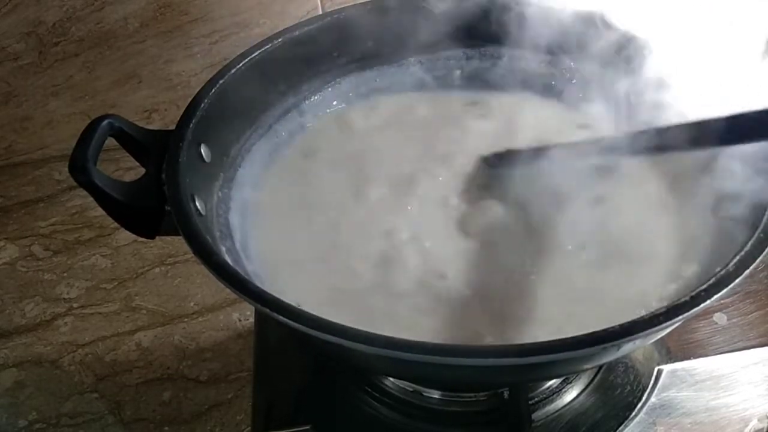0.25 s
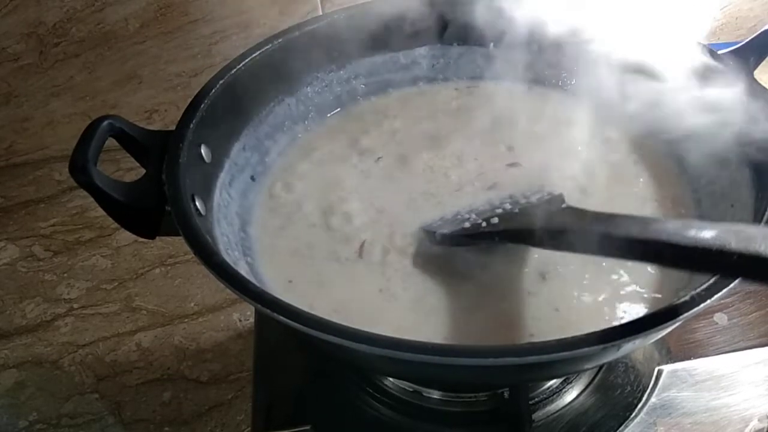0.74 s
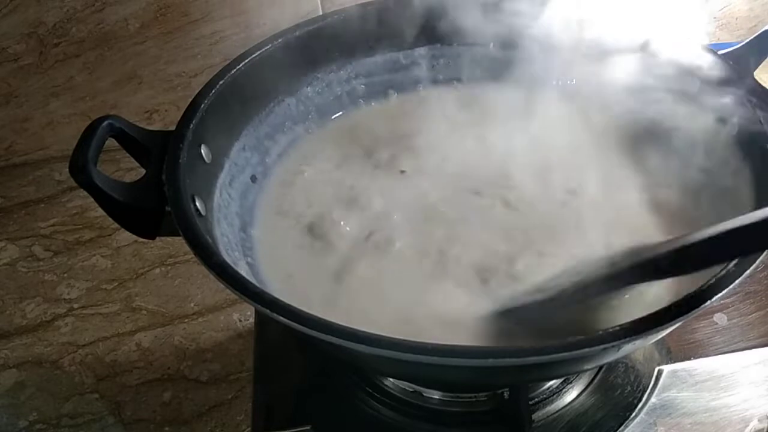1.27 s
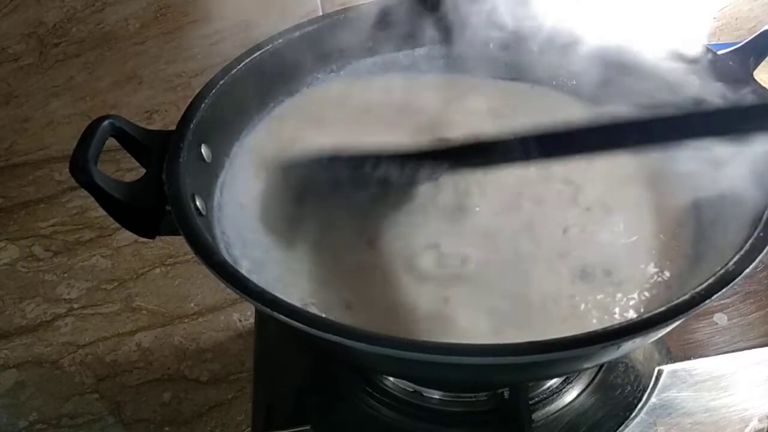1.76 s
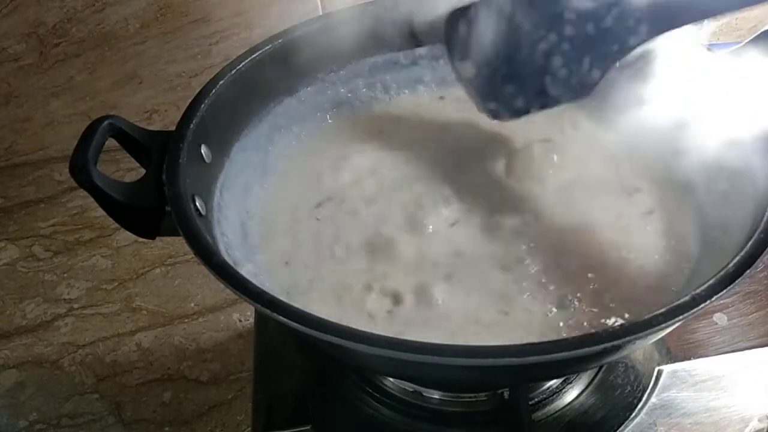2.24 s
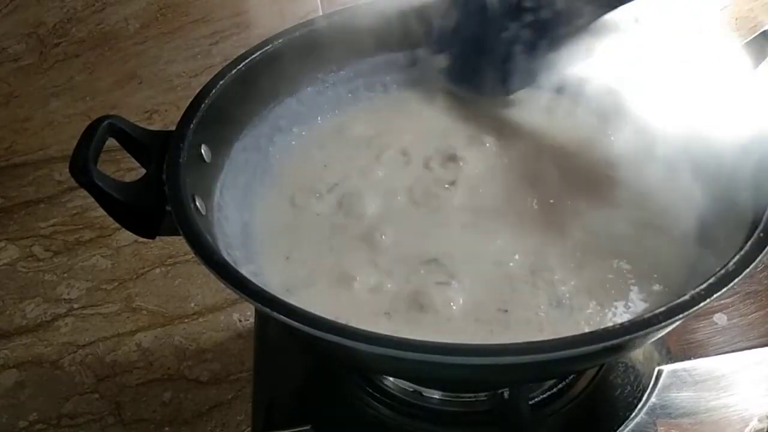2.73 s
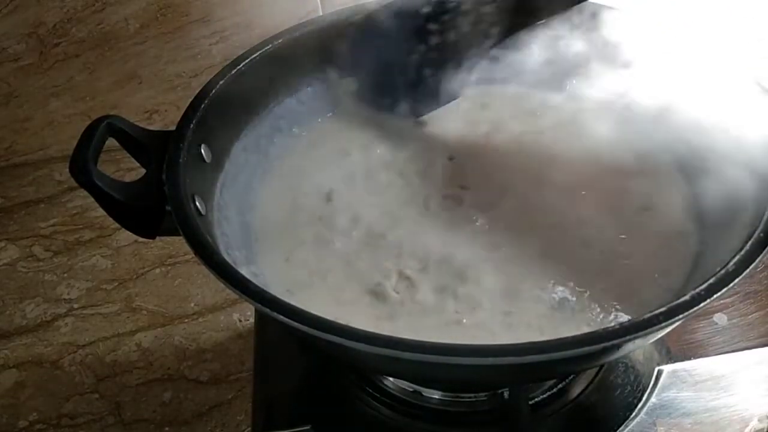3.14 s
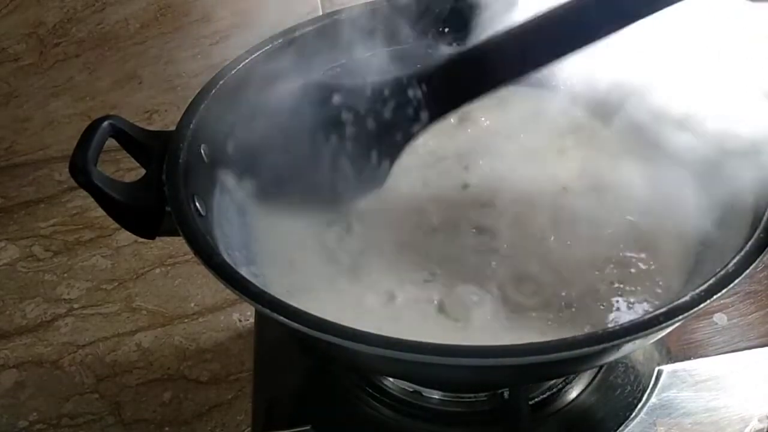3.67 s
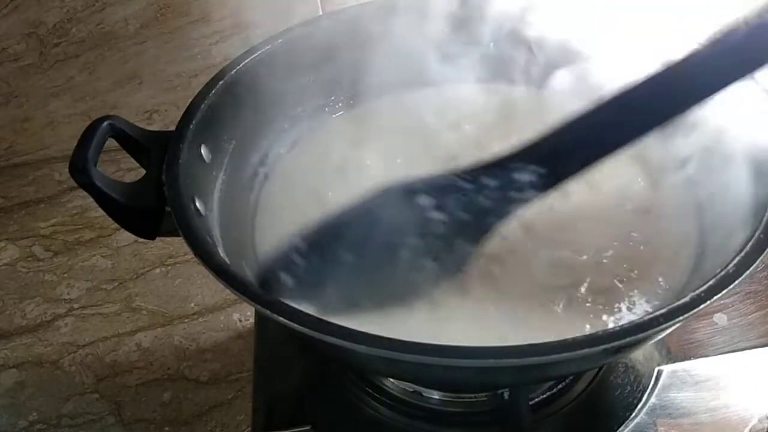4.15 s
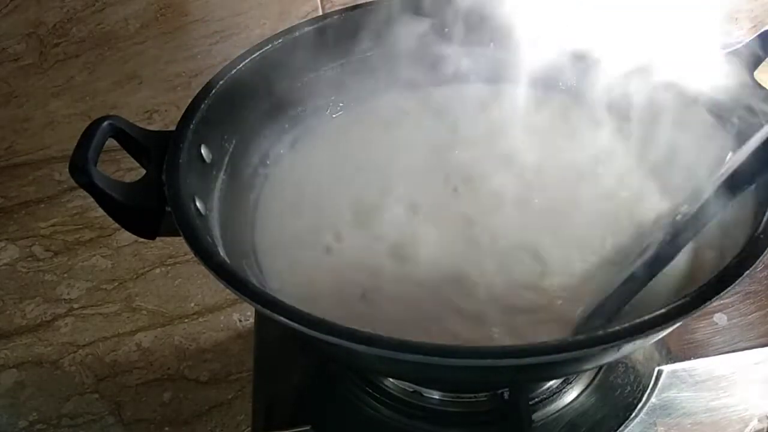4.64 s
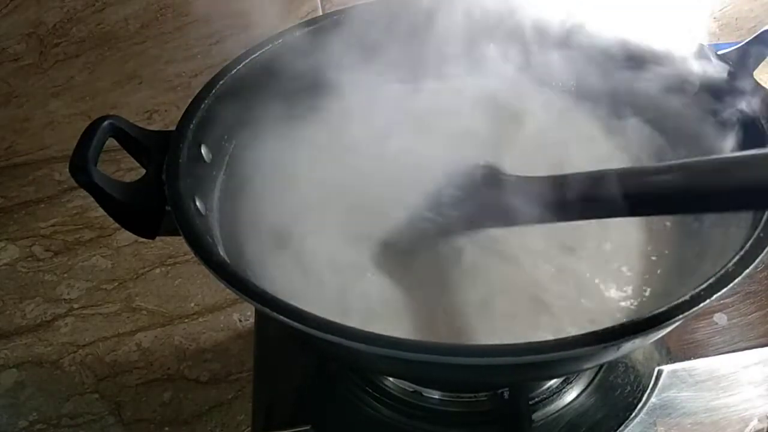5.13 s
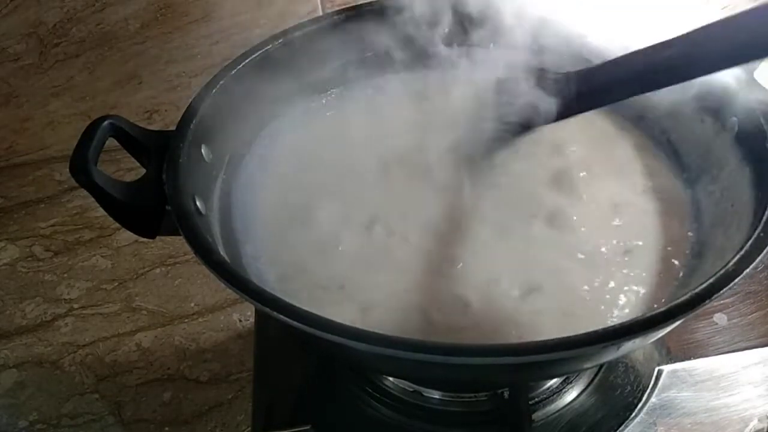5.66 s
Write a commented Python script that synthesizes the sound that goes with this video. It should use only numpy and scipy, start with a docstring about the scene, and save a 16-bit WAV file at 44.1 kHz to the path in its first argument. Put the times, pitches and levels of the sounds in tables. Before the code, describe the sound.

Mono, close to a metal pan in a hard, briefly echoing kitchen. Thick porridge simmers throughout: hollow, wet plops of low-mid to mid pitch, singly or bunched, among many tiny bubbles. At 0.35-0.45 s the sound cuts out completely. The burner gives a faint, deep rumble, bumping up as the pan rocks. The spatula rubs grittily and makes the pan hum low around 0.5-1 s, with a clear scrape near 0.8 s and a light tap; another scrape comes at 1.7 s with a burst of hiss and spitting. The loudest plop is at 2.0 s. At 2.67 s a hard knock cracks and rings the pan for about half a second, with a weaker rap following. Bright droplet snaps and crackle continue, busy around 4.2-4.8 s; scraping returns at 5-5.8 s. A small bird chirps faintly at 2.9 s, then repeatedly from 4.7 s. A thin, high, wavering whistle sounds from 5.5 s.

```python
"""Thick porridge simmers in a pan in a hard-walled kitchen: swelling sine notes plop, singly and in swarms.
Droplets spit and crackle as short pings on the hot rim; steam hisses as gritty filtered impulses.
A spatula scrapes in clumped impulses, makes the pan drone, and knocks it, once hard, ringing its modes.
The burner rumbles as low noise. A small bird chirps in gliding notes; a thin sine whistle comes near the end."""
import sys
import numpy as np
from scipy import signal
from scipy.fft import rfft, irfft, next_fast_len
from scipy.io import wavfile
from scipy.ndimage import uniform_filter1d

SR = 44100
rng = np.random.default_rng(int(sys.argv[2]) if len(sys.argv) > 2 else 0)


def wrap_up_sound(samples):
    """Save the sound to the file named by the first command line argument, as 16-bit audio."""
    columns = np.atleast_2d(samples).T
    # keep every value between -1 and 1, then stretch to whole-number steps
    tamed = np.clip(columns, -1, 1)
    steps = np.round(tamed * 32767).astype(np.int16)
    wavfile.write(sys.argv[1], SR, steps)


N = 260190
TIME_S = np.arange(N) / SR


def amp(db):
    """Decibels to gain."""
    return 10 ** (np.asarray(db) / 20)


def unit(x):
    """x at rms 1."""
    return x / np.sqrt(np.mean(x ** 2) + 1e-20)


def along(points, hz):
    """(Hz, value) points interpolated on a log frequency axis."""
    f, v = np.transpose(points)
    return np.interp(np.log(hz + 1), np.log(f), v)


def add(track, start_s, sound):
    """Mix a sound into the track at start_s."""
    part = track[max(0, round(start_s * SR)):][:len(sound)]
    part += sound[:len(part)]


def clipped_normal(shape, top=2):
    """Gaussian scatter held between -2 and top."""
    return np.clip(rng.standard_normal(shape), -2, top)


def filtered(x, response):
    """x times a response of frequency."""
    m = next_fast_len(len(x) + SR // 10)
    return irfft(rfft(x, m) * response(np.fft.rfftfreq(m, 1 / SR)), m)[:len(x)]


def coloured(x, spectrum, size=1024):
    """x through a causal, minimum-phase filter of energy 1 with the given spectrum."""
    gain = amp(along(spectrum, np.fft.rfftfreq(size, 1 / SR)))
    cepstrum = irfft(np.log(gain + 1e-6))
    cepstrum[1:size // 2] *= 2
    cepstrum[size // 2 + 1:] = 0
    pulse = irfft(np.exp(rfft(cepstrum)))
    return signal.fftconvolve(x, pulse / np.linalg.norm(pulse))[:len(x)]


def noise(spectrum):
    """Steady noise of rms 1 with the given spectrum."""
    return unit(filtered(rng.standard_normal(N), lambda hz: amp(along(spectrum, hz))))


def grains(rate_hz, spread_db):
    """Random impulses of uneven size and random sign, rms 1."""
    size = amp(spread_db * clipped_normal(N))
    return unit((rng.random(N) < rate_hz / SR) * size * rng.choice([-1, 1], N))


def clumps(rate_hz, depth_db):
    """A gain of rms 1 that wanders between random levels, rate_hz of them a second."""
    knots = clipped_normal(4096, top=1.5)
    return unit(amp(depth_db * np.interp(TIME_S * rate_hz, np.arange(len(knots)), knots)))


def swell(start_s, rise_s, hold_s, t60_s):
    """An envelope of peak 1: it rises, holds and dies away."""
    t = TIME_S - start_s
    rise = np.clip(t / max(rise_s, .001), 0, 1) ** 2
    return rise * amp(-60 * np.clip((t - rise_s - hold_s) / t60_s, 0, 2))


# kitchen reverberation before stretch: (f/Hz, t60/s)
KITCHEN_T60 = [(150,1),(400,0.21),(1000,0.45),(3000,0.4),(8000,0.24),(15000,0.37)]


def kitchen(x, wet_db, stretch=1, count=8):
    """x plus room reflections: decaying noise tails, a new one for each of count equal pieces."""
    out = x.copy()
    for k, piece in enumerate(np.array_split(x, count)):
        hz, t, z = signal.stft(rng.standard_normal(SR * 2 // 3), SR, nperseg=256)
        early = 1 + 0.9 * amp(-60 * t / 0.063)  # pan wall and counter answer first
        decay = amp(-60 * t / (stretch * along(KITCHEN_T60, hz)[:, None]))
        tail = signal.istft(z * early * decay, SR, nperseg=256)[1]
        wet = signal.fftconvolve(piece, tail / np.linalg.norm(tail))
        add(out, k * N / count / SR, amp(wet_db) * wet)
    return out


def bubble(hz, cycles, glide):
    """A steam pocket opens: its note swells, rises as the hole widens, and dies."""
    t = np.arange(SR // 20) / SR
    u = t * hz / max(cycles, .2)  # level peaks at u = 1.449
    phase = 2 * np.pi * hz * np.cumsum(1 + glide * np.tanh((u - 1.5) / 2)) / SR
    return (u / 1.491 * np.exp(1 - u / 1.449)) ** 1.78 * np.sin(phase)


# flurry of small bubbles after a big one: level relative to it, ceiling before size scatter
FLURRY_REL_DB, FLURRY_CEILING_DB = -18.5, -53.5
FLURRY_LAG_S, FLURRY_SPREAD_S, FLURRY_SPREAD_OCT = 0.0066, .05, 0.5394
STRAY_DB, STRAY_HZ, STRAY_SPREAD_OCT = -63, 800, 0.631
SMALL_SWELL_CYCLES, SMALL_SPREAD_DB = 2.39, 3
FROTH_DB, FROTH_HZ, FROTH_SPREAD_OCT, FROTH_SWELL_S = -73.5, 2800, 0.94, 0.0051
SURGE_SPREAD_OCT = 0.397
# boil welling up in a patch: (t/s, length/s, bubble level/dB, typical f/Hz)
SURGES = [(0,0.3,-54,960),(0,0.19,-65,1400),(0.772,0.19,-51,912),(1.152,.25,-63.5,1304),(1.478,0.3,-51.5,498),(1.497,0.19,-53.5,1290),(2.699,.16,-47.5,518),(3.599,0.32,-54,875),(4.614,.3,-54,800),(4.884,0.17,-57,594),(5.028,0.23,-52,1031),(5.761,.14,-53.5,615)]


def simmer(flurry_count=9, surge_count=24, stray_count=220, froth_count=130):
    """Small bubbles: a flurry after each big one, surges, strays all over the surface, and pinhead froth."""
    out, swarm = np.zeros(N), []
    for s, db, hz, _ in PLOPS:
        flurry_db = min(db + FLURRY_REL_DB, FLURRY_CEILING_DB)
        for lag in rng.standard_normal(flurry_count):
            start_s = s + FLURRY_LAG_S + FLURRY_SPREAD_S * abs(lag)
            swarm.append((start_s, flurry_db, hz, FLURRY_SPREAD_OCT))
    for s, length_s, db, hz in SURGES:
        swarm += [(s + length_s * u, db, hz, SURGE_SPREAD_OCT) for u in rng.random(surge_count)]
    for s in rng.uniform(0, N / SR, stray_count):
        swarm.append((s, STRAY_DB, STRAY_HZ, STRAY_SPREAD_OCT))

    for (s, db, hz, octaves), (pitch, size, life) in zip(swarm, clipped_normal((len(swarm), 3))):
        cycles = SMALL_SWELL_CYCLES * np.exp(0.33 * life)
        note = bubble(hz * 2 ** (octaves * pitch), cycles, glide=0.046)
        add(out, s, amp(db + SMALL_SPREAD_DB * size) * note)

    froth_s = rng.uniform(0, N / SR, froth_count)
    for s, (pitch, size) in zip(froth_s, clipped_normal((froth_count, 2))):
        hz = FROTH_HZ * 2 ** (FROTH_SPREAD_OCT * pitch)
        add(out, s, amp(FROTH_DB + 5.2 * size) * bubble(hz, hz * FROTH_SWELL_S, glide=.015))
    return kitchen(out, wet_db=-5.5)


SCRAPE_T60_S, DRONE_T60_S = 0.2, 0.29
# blade rub spectrum: (f/Hz, relative level/dB)
RUB_SPECTRUM = [(200,-65),(600,-6),(1100,0.5),(1700,2),(2400,-1),(4000,-7.5),(6000,-6.5),(11000,-32),(16000,-46)]
# spatula strokes: (t/s, rise/s, hold/s, relative scrape level/dB, relative drone level/dB)
STROKES = [(0,0.027,0.04,-73.5,-48),(0.499,0.044,0.032,-67,-43.5),(0.778,0.048,0.016,-42,-39.5),(0.903,0.025,0.018,-48,-48.5),(1.087,0.046,0.21,-56,-68),(1.39,0.038,0.34,-67.5,-92),
           (1.676,0.057,0.11,-46,-55.5),(1.846,0.045,0.2,-75,-43),(2.31,0.021,0.026,-60,-72),(3.274,0.19,0.078,-79,-52.5),(3.616,0.019,0.15,-55,-98),(4.61,.05,.2,-61.5,-91),
           (4.978,0.12,0.05,-50,-60),(5.123,0.086,.12,-50.5,-75),(5.376,0.049,0.037,-54,-55),(5.616,0.2,0.065,-55.5,-63.5)]


def stirring():
    """In each stroke the blade sticks and slips over the metal and sets the pan's lowest mode droning."""
    scraping = sum(amp(db) * swell(s, rise, hold, SCRAPE_T60_S) for s, rise, hold, db, _ in STROKES)
    droning = sum(amp(db) * swell(s, rise, hold, DRONE_T60_S) for s, rise, hold, _, db in STROKES)
    slips = clumps(rate_hz=70, depth_db=6) * grains(rate_hz=780, spread_db=2.0)
    rub = amp(-7) * scraping * coloured(slips, RUB_SPECTRUM)
    # narrow noise band round 194 Hz
    drone = unit(filtered(rng.standard_normal(N), lambda hz: 1 / (1 + ((hz - 194) / 18) ** 4)))
    return kitchen(rub, wet_db=-3.5) + amp(-10.5) * droning * drone


BURNER_DB = -76
BUMP_RISE_S, BUMP_HOLD_S, BUMP_T60_S = 0.0085, 0.015, 0.6
# stove rumble spectrum: (f/Hz, relative level/dB)
RUMBLE_SPECTRUM = [(25,-24),(45,-7.5),(62,-1.5),(76,6),(92,-4),(110,4.5),(130,-13.5),(150,-15),(220,-50)]
# pan rocking on the stove: (t/s, level/dB)
BUMPS = [(0.069,-57.5),(0.259,-66.5),(.84,-74),(1.21,-62),(1.55,-64),(1.971,-53.5),(2.07,-68),(2.58,-65),(2.76,-57.5),(3,-66),(4.76,-63),(5.31,-60),(5.621,-65)]


def stove():
    """The stove rumbles with the flame, and more when the pan rocks on it."""
    rocking = sum(amp(db) * swell(s, BUMP_RISE_S, BUMP_HOLD_S, BUMP_T60_S) for s, db in BUMPS)
    return np.hypot(amp(BURNER_DB), rocking) * noise(RUMBLE_SPECTRUM)


# room background spectrum: (f/Hz, relative level/dB)
QUIET_SPECTRUM = [(18, -25), (30, 15), (81, -16), (145, -55), (203, 42), (424, -22), (775, 31), (1570, -63),
                  (2390, -45), (2950, -55), (5680, -56), (8420, -37), (15800, -14)]


def room_quiet():
    """The quiet of the room: faint steady coloured noise."""
    return amp(-78.5) * noise(QUIET_SPECTRUM)


# bursting-droplet spectrum: (f/Hz, relative level/dB)
SIZZLE_SPECTRUM = [(1060, -36), (1800, -42), (2060, -1.5), (2260, -4.5), (3130, -15.5), (4630, -6.5),
                   (6140, -18.5), (6910, -6), (8060, -0.5), (9580, -9), (15800, -23)]


def ping(hz, t60_s, count=4):
    """A tiny bubble bursts: one main note and a few unrelated ones, peak 1."""
    t = np.arange(SR // 50) / SR
    others_hz = np.clip(7000 * np.exp(.36 * rng.standard_normal(count)), 3000, 13000)
    others_db = rng.normal(0, 3, count) + .5 * along(SIZZLE_SPECTRUM, others_hz)
    pitch_hz = np.r_[hz, others_hz]
    size = np.r_[1, .6 * amp(others_db)]
    onset = (1 - np.exp(-t / 0.0006)) ** 2
    ring = size @ np.sin(2 * np.pi * pitch_hz[:, None] * t) * amp(-60 * t / t60_s) * onset
    return ring / np.abs(ring).max()


DRY_RIM_DB, DRYING_T60_S = -80, 0.47  # relative level of the constant crackle; drying of a wash
POCKET_REL_DB = -15  # hollow under a droplet, relative to its ping
SPRAY_REL_DB, SPRAY_T60_S = -26.5, 0.074  # crackle gain after a spit, relative to its table level
# porridge washing up the hot rim: (t/s, rise/s, hold/s, relative level/dB)
WASHES = [(0.833,0.066,0.023,-61),(1.133,0.039,0.16,-64),(1.7,0.076,0.054,-53.5),(2.7,0.015,0.031,-91),(3.604,0.048,0.19,-56),(4.244,0.012,0.72,-64.5),(4.61,0.047,0.042,-65),(5.28,0.013,0.024,-91),(5.67,0.16,0.061,-64.5)]
# droplets bursting on hot metal: (t/s, relative level/dB, f/Hz)
SPITS = [(.3092,-47.5,8330),(0.475,-42,8140),(0.5448,-31,4660),(0.5638,-31.5,3270),(0.7554,-38.5,5280),(0.8366,-29,7500),(0.9494,-27.5,8070),
         (1.0043,-29.5,5830),(1.136,-32,7820),(1.156,-27.5,8230),(1.2298,-33,7830),(1.255,-32,7640),(1.734,-21.5,7080),(1.9413,-33.5,8330),
         (2.0727,-38,5420),(2.153,-36,8100),(2.187,-35,8500),(2.354,-25.5,8030),(3.0877,-34,7370),(3.1664,-37,4990),(3.231,-40.5,8000),
         (3.3895,-37.5,7200),(3.425,-29.5,7170),(3.463,-31.5,7850),(3.5378,-34.5,7640),(3.6333,-31,7400),(3.8102,-33,8830),(3.9745,-35.5,8350),(4.05,-38,7100),
         (4.2759,-28.5,5780),(4.346,-32,7020),(4.4242,-33.5,7500),(4.5049,-29,8080),(4.6287,-23.5,7830),(4.6538,-26,5600),(4.734,-21.5,3460),
         (4.951,-49,8300),(5.016,-34,5400),(5.2014,-26,3350),(5.2347,-29,3580),(5.31,-31.5,7450),(5.617,-33,3470)]


def sizzle(count=900):
    """Droplets burst on the hot rim: sharp spits, and a crackle of tiny pings that grows with washes and spits."""
    crackle, spits, t = np.zeros(N), np.zeros(N), np.arange(SR // 50) / SR
    for s, (pitch, size) in zip(rng.uniform(0, N / SR, count), clipped_normal((count, 2), top=(2, 1.7))):
        add(crackle, s, amp(4 * size) * ping(6000 * np.exp(.38 * pitch), t60_s=.009))

    wetness = amp(DRY_RIM_DB) + sum(amp(db) * swell(s, rise, hold, DRYING_T60_S)
                                    for s, rise, hold, db in WASHES)
    spray = amp(SPRAY_REL_DB - 60 * np.arange(SR // 2) / SR / SPRAY_T60_S)
    for s, db, hz in SPITS:
        # the film snaps
        tear = coloured(rng.standard_normal(len(t)) * amp(-60 * t / 0.016), SIZZLE_SPECTRUM)
        tear = 0.41 * tear / np.abs(tear).max()
        # the hollow under it rings lower
        pocket = ping(3400 * np.exp(0.14 * rng.standard_normal()), t60_s=0.016, count=2)
        burst = ping(hz, t60_s=0.0086) + tear + amp(POCKET_REL_DB) * pocket
        add(spits, s, amp(db - 10.5) * burst)
        add(wetness, s, amp(db) * spray)
    rim = amp(-4.5) * wetness * unit(coloured(crackle, SIZZLE_SPECTRUM))
    return kitchen(rim + spits, wet_db=2.5)


# big bubbles: (t/s, level/dB, f/Hz, swell scale/cycles)
PLOPS = [(.172,-47,796,3.1),(0.322,-43,807,2.8),(.342,-34.5,1216,1.1),(.452,-39,1260,1.02),(.472,-34.5,1080,0.6),
         (1.085,-37.5,549,0.64),(1.098,-46.5,676,1.5),(1.132,-37,565,0.53),(1.154,-34.5,2000,1.4),(1.179,-36.5,630,0.48),(1.33,-35,1097,0.34),
         (1.462,-42,325,1.2),(1.501,-38,445,0.93),(1.513,-36.5,514,1.5),(1.673,-35,1180,0.33),(1.693,-58,330,0.88),(1.805,-32.5,1405,0.83),
         (1.961,-31,1160,0.45),(1.998,-23,738,0.95),(2.042,-34.5,1160,1.2),(2.137,-42,810,1.4),(2.28,-51,510,3.1),(2.321,-37.5,422,0.99),(2.381,-40,1655,2.4),
         (2.587,-49,435,0.66),(2.617,-46,1167,4.3),(2.88,-30.5,632,0.54),(3.031,-45.5,744,3),(3.05,-46.5,1440,1.2),(3.148,-42.5,1580,2),(3.202,-41.5,1612,1.2),
         (3.395,-45.5,759,1.7),(3.565,-42.5,835,6.6),(3.613,-43.5,792,2.1),(3.613,-42,1670,2.3),(3.616,-35,461,0.68),(3.721,-36.5,1228,1.3),(3.793,-39.5,736,0.85),
         (3.854,-39.5,565,1.54),(3.888,-47.5,1600,1),(3.946,-49.5,462,1.3),(4.012,-62.5,1540,8),(4.115,-44.5,500,0.35),(4.177,-35,870,1.8),(4.193,-42.5,1180,2.8),(4.21,-40,486,0.9),
         (4.239,-29,1080,0.78),(4.243,-36,1430,1.64),(4.276,-51.5,412,1.5),(4.38,-47,866,3.5),(4.624,-45.5,826,1),(4.639,-45,376,2),(4.698,-41.5,707,2.8),(4.748,-39.5,847,1.85),
         (4.795,-34.5,894,0.78),(4.849,-45,848,4.2),(4.944,-41,331.5,1.17),(4.985,-47.5,333,0.93),(5.068,-38.5,852,1.8),(5.209,-38,1190,1),
         (5.286,-31,1743,1.3),(5.319,-35,1920,1.4),(5.559,-45,693,1.28),(5.673,-41.5,760,1.95),(5.804,-31.5,672,1.17)]


def plops():
    """Big steam pockets open one by one, each a single swelling note."""
    out = np.zeros(N)
    for s, db, hz, cycles in PLOPS:
        add(out, s, amp(db) * bubble(hz, cycles, glide=0.03))
    return kitchen(out, wet_db=-1.0)


# hiss spectrum: (f/Hz, relative level/dB)
STEAM_SPECTRUM = [(820, -17), (1400, -21.5), (1600, -4), (1980, -32), (2230, -17), (2820, -12.5),
                  (3420, -11), (5670, -18.5), (6150, -18.5), (7770, -13), (13000, -29.5), (15800, -27)]
# bursts of steam: (t/s, level/dB, t60/s, upper edge f/Hz)
PUFFS = [(0.492,-51,0.31,9400),(0.541,-45,0.065,5000),(.835,-66,0.12,7000),(0.928,-48,0.13,9300),(1.134,-51,0.24,10000),(1.145,-43,0.076,11000),(1.672,-41.5,0.09,5000),(1.729,-42.5,0.43,11780),(2.349,-48,0.16,15200),(2.696,-44.5,0.3,9900),(3.391,-66.5,.5,12000),(3.72,-58.5,0.4,12000),(4.628,-49,0.053,8000),(5.016,-52.5,0.21,10000),(5.199,-50,0.13,8950),(5.311,-51,0.42,8000)]


def steam():
    """Wet porridge meets bare metal and hisses in short, gritty bursts."""
    out, t = np.zeros(N), np.arange(SR // 3) / SR
    sputter = clumps(rate_hz=160, depth_db=3.5)
    grit = coloured(sputter * grains(rate_hz=4200, spread_db=-5.5), STEAM_SPECTRUM)
    onset = 1 - np.exp(-t / 0.00074)
    for s, db, t60_s, edge_hz in PUFFS:
        burst = grit[round(s * SR):][:len(t)] * amp(db - 60 * t / t60_s) * onset
        add(out, s, filtered(burst, lambda hz: 1 / (1 + (hz / edge_hz) ** 4) ** .5))
    return kitchen(out, wet_db=-9.0)


# modes of the filled pan: (f/Hz, relative level/dB, t60/s)
PAN_MODES = [(192,-15,.5),(262,-7,.25),(327,0,.55),(435,-8,.35),(481,-12,.4),(532,-9,.35),(770,-17,.55),(851,-17,.55),(1082,-20,.45),(1261,-19,.45),(1384,-17,.35),(1521,-19,.4),(1830,-16,.3),(2013,-13,.3),(2159,-17,.25),(2724,-26,.4)]
# crack spectrum: (f/Hz, relative level/dB)
CRACK_SPECTRUM = [(60,-65),(150,-12),(300,-39),(700,6),(1300,2.5),(2000,2.5),(2600,-6),(5000,-16),(8500,-22.5),(14000,-57)]
# thud spectrum: (f/Hz, relative level/dB)
THUD_SPECTRUM = [(60,-50),(130,-51),(220,-5),(320,8.5),(470,-12),(700,-12),(1200,-39.5),(3000,-67)]
# spatula blows: (t/s, relative crack level/dB, relative ring level/dB)
BLOWS = [(0.822,-39,-55.5),(0.84,-46.5,-62),(2.667,-26,-25.5),(2.676,-36.5,-39.5),(2.696,-53,-51),(2.77,-38,-42),(5.852,-48.5,-80)]


def knocks():
    """The spatula strikes the pan: a hard crack, a rattle, a thud and the damped ring of the metal."""
    out, ringing, t = np.zeros(N), np.zeros(N), np.arange(SR * 2 // 3) / SR
    for s, crack_db, ring_db in BLOWS:
        ring = np.zeros(len(t))
        for hz, db, t60_s in PAN_MODES:
            level = amp(db + rng.normal(0, 0.61) - 60 * t / t60_s)
            ring += level * np.sin(2 * np.pi * (hz * t + rng.random()))
        thud = coloured(rng.standard_normal(len(t)), THUD_SPECTRUM) * amp(-60 * t / 0.37)
        rattle_level = 1.28 * amp(-60 * t / 0.015) + 0.32 * amp(-60 * t / 0.45)
        rattle = rng.standard_normal(len(t)) * rattle_level
        click = 2 * (t == 0)
        blade = np.sin(2 * np.pi * 1750 * t) * amp(-60 * t / 0.0031)  # stiff blade, a few cycles
        add(out, s, amp(crack_db) * (coloured(rattle + click, CRACK_SPECTRUM) + 3.3 * blade))
        add(ringing, s, amp(ring_db) * (0.48 * ring + 0.36 * thud) * (1 - np.exp(-t / 0.003)))
    return kitchen(out, wet_db=-2) + ringing


GLIDE_EASE, FLUTTER_SHARE = 1.85, 0.025  # glide slows towards its end; rms pitch unsteadiness
# bird phrases before pitch ratio: (delay t/s, length/s, first f/Hz, last f/Hz, relative level/dB)
TWEET = [(0,0.025,4986,3200,3),(.023,0.016,5340,4070,1),(0.047,0.0238,2596,3210,0),(.058,.014,3800,4500,-12),(0.07,0.0262,3600,2928,2.5)]
# columns as TWEET: (delay t/s, length/s, first f/Hz, last f/Hz, relative level/dB)
CHIRP = [(0,0.017,2300,3500,-4),(.021,0.01,5560,3650,4.5),(.032,.03,3800,3750,-4),(.062,0.019,3910,2800,-3)]
# columns as TWEET: (delay t/s, length/s, first f/Hz, last f/Hz, relative level/dB)
CHIRRUP = [(0,0.0091,2800,4280,-1.5),(0.017,0.026,2510,3090,7),(.044,0.012,4035,2400,4.5),(.062,0.04,2532,2437,2.5)]
# columns as TWEET: (delay t/s, length/s, first f/Hz, last f/Hz, relative level/dB)
PIP = [(0,0.0424,3500,4200,0)]
# bird calls: (t/s, phrase, pitch ratio, level/dB)
BIRD_CALLS = [(2.903,CHIRRUP,0.95,-54),(4.692,TWEET,0.97,-52),(5.06,TWEET,0.96,-49.5),(5.346,TWEET,0.95,-47),(5.691,CHIRP,0.96,-47),(5.857,PIP,0.91,-44.5)]


def bird():
    """Quick gliding notes with a slight flutter and a weak octave, heard mostly by way of the walls."""
    out = np.zeros(N)
    for s, phrase, ratio, call_db in BIRD_CALLS:
        for delay_s, length_s, first_hz, last_hz, db in phrase:
            u = np.linspace(0, 1, round(length_s * SR))
            flutter = unit(uniform_filter1d(rng.standard_normal(len(u)), size=70))
            glide_hz = last_hz + (first_hz - last_hz) * (1 - u) ** GLIDE_EASE
            hz = ratio * glide_hz * (1 + FLUTTER_SHARE * flutter)
            phase = 2 * np.pi * np.cumsum(hz) / SR
            octave = amp(np.interp(hz, [3000, 3500, 4400], [-28, -12, -24]))  # strongest mid-range
            note = np.sin(phase) + octave * np.sin(2 * phase)
            envelope = np.abs(np.sin(np.pi * u)) ** .5
            add(out, s + delay_s, amp(call_db + db) * envelope * note)
    return kitchen(out, wet_db=4, stretch=2.1)


WHISTLE_HZ, WHISTLE_T60_S = 2024, .18
# whistle notes: (t/s, rise/s, hold/s, level/dB)
WHISTLES = [(5.47,.04,0.018,-60),(5.545,.08,0.21,-55.5)]


def whistle():
    """A thin sine whistle that wavers in level: a short start, then a longer note."""
    level = sum(amp(db) * swell(s, rise, hold, WHISTLE_T60_S) for s, rise, hold, db in WHISTLES)
    return level * clumps(rate_hz=45, depth_db=4.5) * np.sin(2 * np.pi * WHISTLE_HZ * TIME_S)


def scene():
    """Everything at the stove, over the quiet of the room."""
    pan = simmer() + stirring() + sizzle() + plops() + steam() + knocks()
    surroundings = stove() + room_quiet() + bird() + whistle()
    return (pan + surroundings)[None]


def record(dry):
    """The microphone loses deep bass and the highest treble; the sound cuts out for 0.11 s early on."""
    live = (TIME_S < .345) | (TIME_S > .4535)
    microphone = [(25, -14), (55, -2), (75, 0), (9000, 0), (13000, -4), (16000, -3)]  # (f/Hz, level/dB)
    top_hz = 15850
    return filtered(dry[0] * live, lambda hz: amp(along(microphone, hz)) * (hz < top_hz))[None]


dry = scene()
out = record(dry)
wrap_up_sound(out)
```